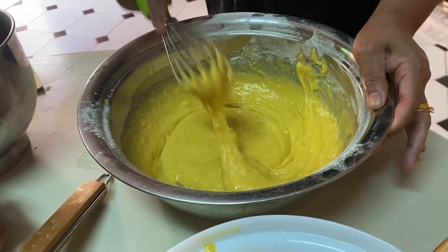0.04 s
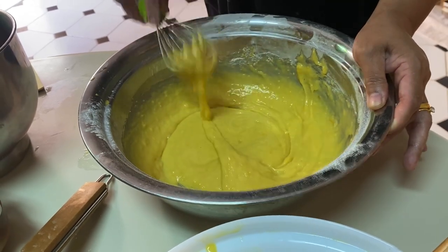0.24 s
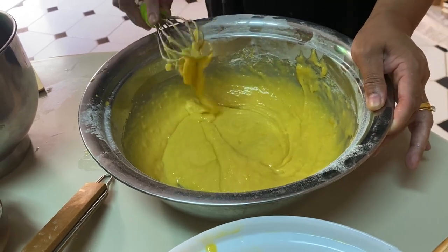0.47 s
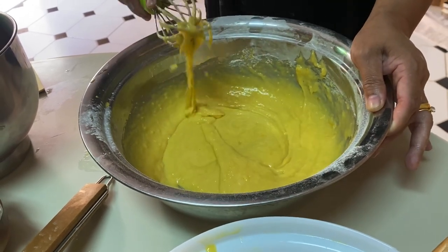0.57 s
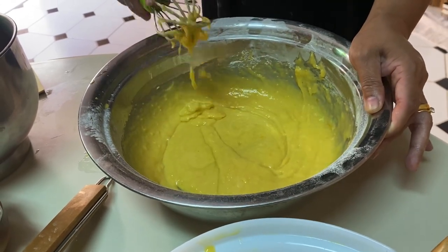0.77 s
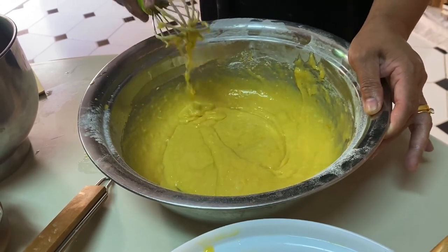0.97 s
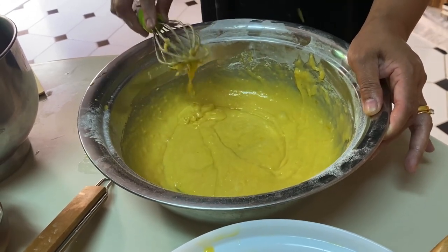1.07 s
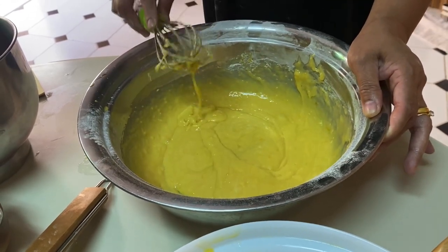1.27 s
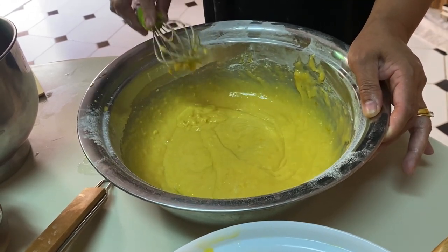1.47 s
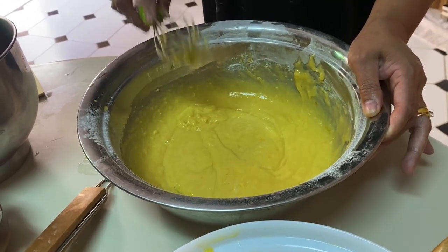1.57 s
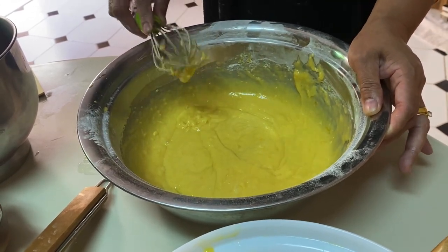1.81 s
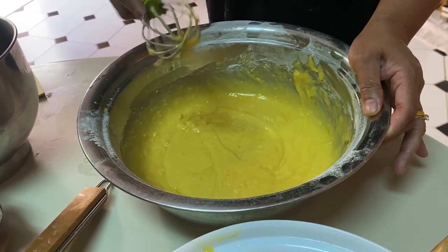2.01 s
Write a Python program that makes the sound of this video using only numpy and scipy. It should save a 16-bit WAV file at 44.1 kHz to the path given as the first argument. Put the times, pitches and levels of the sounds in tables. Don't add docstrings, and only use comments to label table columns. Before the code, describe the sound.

A wire whisk taps a steel bowl of batter nine times, evenly about every 0.19 seconds from 0.2 to 1.7. A tiny rustle leads into each bright, rattling clink, quickly damped with a faint metallic ring and a low thud on the counter. The first clink is loudest; thuds are heaviest around 0.8 to 1.2. Close stereo pickup, low hum, short hard-kitchen reverberation.

```python
import sys
import numpy as np
from scipy import signal
from scipy.fft import rfft, irfft, next_fast_len
from scipy.io import wavfile

SR = 44100
rng = np.random.default_rng(int(sys.argv[2]) if len(sys.argv) > 2 else 0)


def nominal_scale(level):
    x = np.asarray(level, float) / 20
    return 10 ** x


def persist_wave(psi):
    counts = np.round(np.clip(psi, -1, 1) * 32767).astype(np.int16)
    wavfile.write(sys.argv[1], SR, np.atleast_2d(counts).T)


N = 90404

# (frequency [Hz], level [dB per Hz])
HUM_SPECTRUM = [(15, -32), (25, -1.5), (145, -9.5), (178, 2), (314, -14.5), (584, -14), (682, -15),
                (776, -14), (12000, -51.5), (15600, -62), (22000, -120)]
# (frequency [Hz], correlation [-1 to 1])
HUM_LIKENESS = [(60, 1), (240, 1), (950, -0.46), (3770, 0.63), (15000, 0.16)]
# (frequency [Hz], level [dB])
RUSTLE_SPECTRUM = [(1500, -29), (5500, 6), (8000, -19), (12000, -107)]
# (time [s], clink level [dB], thud over clink [dB], lower rim modes [dB], 3 kHz mode [dB])
TAPS = [
    (0.2004, -10.5, -4.5, -4, -12),
    (0.39, -12.5, -2, -2, -4.5),
    (0.5797, -11.5, -2.5, -2.5, -9.5),
    (0.7808, -14.5, 5, 4, -1.5),
    (0.9755, -13.5, 2.5, 3, -2.5),
    (1.1715, -16, 2.5, 5.5, 4),
    (1.3533, -12.5, -3, -2.5, -6.5),
    (1.5487, -13.5, -0.5, 3, -1.5),
    (1.7223, -13, -1, -1.5, 1.5),
]
# (3.8 kHz [dB], 4.85 kHz [dB], 5.4-5.9 kHz [dB], 7 kHz [dB], 1 kHz [dB])
SPOT_LEVELS = [(-2, -4, 0, 3.5, 1), (-4.5, -3, 2, -2, -6), (-10, -5.5, -2.5, 2.5, -2.5),
               (-4.5, 5.5, -4, 7, 0.5), (-1.5, 12, 0, -9, -1), (3, 15.5, -4, -2, 2.5),
               (-0.5, -2, 1.5, 2, 3), (-3, 12, 2, -5.5, 0.5), (-2.5, -2, 1.5, 4.5, -1)]
# (lower edge [Hz], upper edge [Hz])
SPOT_BANDS = [(0, 2000), (2900, 3100), (3700, 3900), (4800, 4900), (5300, 6000), (7000, 7100), (900, 1100)]
# (frequency [Hz], level [dB])
CLICK_SPECTRUM = [(700, -31.5), (1500, -8), (3000, -4), (4300, -4), (6000, -1.5), (9000, 1), (15500, 2.5),
                  (17000, -17)]
RIM_HZ = [1040, 1400, 1520, 1900, 2300, 2550, 2990, 3800, 3230, 5400, 5900, 7030, 14700, 15500]
# (level [dB], decay t60 [s], left over right [dB])
RIM_MODES = [(5.5, 0.01, 3.5), (1, 0.022, 5), (-1.5, 0.028, -9), (-15.5, 0.029, 13.5), (-6.5, 0.032, -14),
             (-10, .02, 4), (-1, 0.037, 11.5), (-5, 0.027, 6), (-21, 0.052, 3), (-10.5, 0.028, 4.5),
             (-11.5, 0.028, -3), (-2, 0.016, 1.5), (3, 0.011, -1), (-1, 0.0061, 1.5)]
SING_HZ = [522, 1224, 1540, 2960, 2992, 3030, 3800, 4890, 4855, 7030]
# (level [dB], decay t60 [s])
SING_MODES = [(8, 0.2), (10.5, 0.14), (-9, 0.14), (-23, .3), (-5.5, 0.13), (8, .3), (0, 0.39), (-6, 0.44),
              (3.5, 0.16), (-2.5, .25)]
THUD_HZ = [132, 200, 245, 318, 400, 478, 530, 635, 800]
# (level [dB], decay t60 [s])
THUD_MODES = [(-6, 0.077), (2.5, 0.034), (-4.5, 0.07), (-1, 0.062), (-10.5, 0.047), (-2, 0.047), (3, 0.029),
              (-6.5, 0.068), (-4.5, 0.026)]
# (frequency [Hz], level [dB], decay t60 [s], delay [s])
BOOM_MODES = [(47.3, -10, 0.59, 0.0086), (66.5, 5, 0.15, 0.017), (119.6, -13, 0.27, 0.0081)]
# (frequency [Hz], decay t60 [s])
ROOM_T60 = [(60, 0.81), (250, 0.34), (600, 0.49), (3000, 0.61), (7000, 0.49), (12000, 0.42)]
# (frequency [Hz], level [dB])
ROOM_LEVEL = [(60, 1.5), (300, -7), (1000, 1.5), (3000, -3), (7000, -7), (15000, -22.5), (15700, -15),
              (16100, -29)]
# (frequency [Hz], correlation [-1 to 1])
ROOM_LIKENESS = [(60, .95), (150, 1), (380, 0.34), (950, 0.041), (2380, 0.3), (5000, 0.46), (7000, 0.28),
                 (8200, .995)]
# (frequency [Hz], left leads right [rad])
PORT_LEAD = [(250, 0.33), (600, 0.95), (1100, 0.44), (1700, 3.12), (2300, 1.2), (3800, 0.13), (5000, 1.14),
             (6900, 0)]
# (frequency [Hz], left over right [dB])
PORT_LEAN = [(60, -0.5), (150, 0.0), (380, 0), (950, 1.5), (2380, 2.5), (5980, 0.0), (15000, -0.5)]

HUM_DB = -55.5
RUSTLE_SAMPLES, RUSTLE_GROWTH_S, RUSTLE_DB = 2000, 0.008, -33.5
WIRES, WIRE_SCATTER_DB = 60, 4.5
LANDING_S, LANDING_FADE_DB = 0.0065, 13
CLICK_DB, CLICK_TO_ROOM_DB = 14.5, 5.5
RIM_DB, RIM_RISE_S, RIM_TO_ROOM_DB = -2.5, 0.0012, -3.5
SING_DB, SING_RISE_S, SING_NEAR_DB = -30, 0.003, -2.5
THUD_DB, THUD_RISE_S = -5.5, 0.0008
KNOCK_S, KNOCK_FIRST_MODE = 0.0048, 3
ROCK_S, ROCK_MODES, ROCK_DB = 0.0132, 4, -3
PUSH_T60_S, PUSH_DB = 0.041, -3
KNOCK_PUSH_HZ, KNOCK_PUSH_DB, ROCK_PUSH_HZ = 394, -6.5, 260
BOOM_DB, BOOM_RISE_S, BOOM_PER_THUD = -7.5, 0.046, 0.22
ROOM_DELAY_S = 0.006
APART_HZ, TURN_HZ = 6900, 4250
CUT_HZ, TOP_HZ = 40.3, 17200

BLOW_T = np.arange(SR // 2) / SR


def unit(x):
    return x / np.sqrt(np.mean(x ** 2) + 1e-20)


def along(points, hz):
    f, v = np.transpose(points)
    return np.interp(np.log(hz + 1), np.log(f + 1), v)


def filtered(x, response):
    size = next_fast_len(x.shape[-1] + 8192)
    spectrum = rfft(x, size) * response(np.fft.rfftfreq(size, 1 / SR))
    return irfft(spectrum, size)[..., :x.shape[-1]]


def causal(points, size=1024):
    log_spectrum = np.log(nominal_scale(along(points, np.fft.rfftfreq(size, 1 / SR))) + 1e-6)
    cepstrum = irfft(log_spectrum, size)
    cepstrum[1:size // 2] *= 2
    cepstrum[size // 2 + 1:] = 0
    impulse = irfft(np.exp(rfft(cepstrum)), size)
    return impulse / np.linalg.norm(impulse)


def spread(pair, likeness):
    def shares(hz):
        turn = np.arccos(np.clip(along(likeness, hz), -1, 1)) / 2
        return np.array([np.cos(turn), np.sin(turn)])

    mid, side = filtered(pair, shares)
    return np.array([mid + side, mid - side])


def ring(hz, db, t60, t, scatter_db, rise_s):
    t = np.maximum(t, 0)
    hz, db, t60 = np.array([hz, db, t60])[:, :, None]
    level = db + rng.normal(0, scatter_db, hz.shape)
    rise = 1 - np.exp(-t / rise_s)
    return rise * nominal_scale(level - 60 * t / t60) * np.sin(2 * np.pi * hz * t)


def hum():
    pair = filtered(rng.standard_normal((2, N)), lambda hz: nominal_scale(along(HUM_SPECTRUM, hz)))
    return nominal_scale(HUM_DB) * unit(spread(pair, HUM_LIKENESS))


def rustle():
    noise = filtered(rng.standard_normal(RUSTLE_SAMPLES), lambda hz: nominal_scale(along(RUSTLE_SPECTRUM, hz)))
    to_contact = np.arange(RUSTLE_SAMPLES)[::-1] / SR
    return nominal_scale(RUSTLE_DB) * np.exp(-to_contact / RUSTLE_GROWTH_S) * unit(noise)


def wire_rattle(click):
    when = rng.random(WIRES) ** 1.3
    sign, scatter = rng.standard_normal((2, WIRES))
    strengths = np.sign(sign) * nominal_scale(WIRE_SCATTER_DB * scatter - LANDING_FADE_DB * when)
    contacts = np.bincount((when * LANDING_S * SR).astype(int), strengths, minlength=len(BLOW_T))
    return signal.fftconvolve(contacts / np.linalg.norm(contacts), click)[:len(BLOW_T)]


def spot_gain(mode_hz, spot_db):
    return np.array([sum(db * (low < f < high) for db, (low, high) in zip(spot_db, SPOT_BANDS))
                     for f in mode_hz])


def rim(spot_db):
    db, t60, pan_db = np.transpose(RIM_MODES)
    modes = ring(RIM_HZ, RIM_DB + db + spot_gain(RIM_HZ, spot_db), t60, BLOW_T, 1.5, RIM_RISE_S)
    sides = nominal_scale(np.outer([0.5, -0.5], pan_db)) @ modes
    return sides, modes.sum(0)


def sing(spot_db):
    db, t60 = np.transpose(SING_MODES)
    level = SING_DB + db + spot_gain(SING_HZ, spot_db)
    return ring(SING_HZ, level, t60, BLOW_T, 1.5, SING_RISE_S).sum(0)


def bowl_thud(thud_db):
    db, t60 = np.transpose(THUD_MODES)
    level = THUD_DB + thud_db + db
    knock = ring(THUD_HZ, level, t60, BLOW_T - KNOCK_S, 1, THUD_RISE_S)[KNOCK_FIRST_MODE:]
    rock = ring(THUD_HZ, level + ROCK_DB, t60, BLOW_T - ROCK_S, 0.71, THUD_RISE_S)[:ROCK_MODES]
    return -knock.sum(0) - rock.sum(0)


def air_push(thud_db):
    level = THUD_DB + thud_db + PUSH_DB
    first = ring([KNOCK_PUSH_HZ], [level + KNOCK_PUSH_DB], [PUSH_T60_S], BLOW_T - KNOCK_S, 1, THUD_RISE_S)
    second = ring([ROCK_PUSH_HZ], [level], [PUSH_T60_S], BLOW_T - ROCK_S, 1, THUD_RISE_S)
    return -(first[0] + second[0])


def counter_boom(thud_db):
    boom = sum(ring([hz], [db], [t60], BLOW_T - delay, 0.7, BOOM_RISE_S)[0]
               for hz, db, t60, delay in BOOM_MODES)
    return nominal_scale(BOOM_DB + BOOM_PER_THUD * thud_db) * boom


def tap(thud_db, *spot_db):
    click = nominal_scale(CLICK_DB) * causal(CLICK_SPECTRUM)
    rattle = wire_rattle(click)
    rim_sides, rim_sum = rim(spot_db)
    singing = sing(spot_db)
    thud = bowl_thud(thud_db)
    near = rattle + rim_sides + nominal_scale(SING_NEAR_DB) * singing + thud
    near = near + air_push(thud_db) + counter_boom(thud_db)
    around = nominal_scale(RIM_TO_ROOM_DB) * rim_sum + singing + thud
    around[:len(click)] += nominal_scale(CLICK_TO_ROOM_DB) * click
    return near, around


def room(x):
    hz, t, noise = signal.stft(rng.standard_normal((2, SR // 2)), SR, nperseg=256)
    fall = nominal_scale(-60 * t / along(ROOM_T60, hz)[:, None])
    fall_rms = np.sqrt(np.mean(fall ** 2, axis=1, keepdims=True))
    shaped = noise * fall / fall_rms * nominal_scale(along(ROOM_LEVEL, hz))[:, None]
    pair = signal.istft(shaped, SR, nperseg=256)[1] / np.sqrt(SR / 2)
    tail = spread(pair, ROOM_LIKENESS)
    delayed = np.pad(x, (round(ROOM_DELAY_S * SR), 0))
    return signal.fftconvolve(delayed[None], tail, axes=1)


def whisk():
    out = np.zeros((2, N + 2 * SR))
    for (time_s, db, *colour), spot in zip(TAPS, SPOT_LEVELS):
        near, around = tap(*colour, *spot)
        wet = room(around)
        i = round(time_s * SR)
        out[:, i - RUSTLE_SAMPLES:i] += nominal_scale(db) * rustle()
        out[:, i:i + near.shape[1]] += nominal_scale(db) * near
        out[:, i:i + wet.shape[1]] += nominal_scale(db) * wet
    return out[:, :N]


def scene():
    return hum() + whisk()


def roll_off(x):
    return signal.sosfilt(signal.butter(12, 17370, fs=SR, output="sos"), x)


def record(dry):
    half = np.array([[0.5], [-0.5]])

    def port_response(hz):
        lead = along(PORT_LEAD, hz) - 2 * np.pi * np.maximum(hz - APART_HZ, 0) / TURN_HZ
        low_cut = hz ** 2 / (hz ** 2 - CUT_HZ ** 2 - 1j * np.sqrt(2) * hz * CUT_HZ)
        band = (hz < TOP_HZ) * low_cut
        return nominal_scale(half * along(PORT_LEAN, hz)) * np.exp(1j * half * lead) * band

    mix = filtered(dry, port_response)
    return roll_off(mix)


dry = scene()
out = record(dry)
persist_wave(out)
```